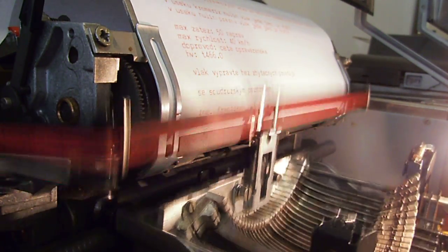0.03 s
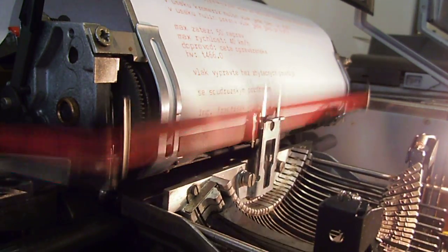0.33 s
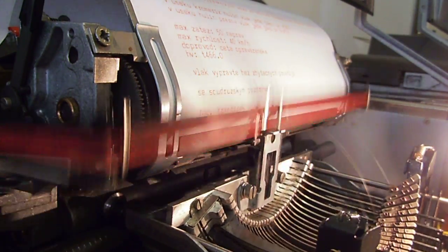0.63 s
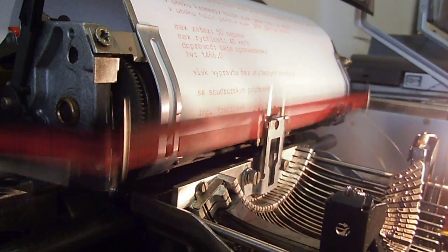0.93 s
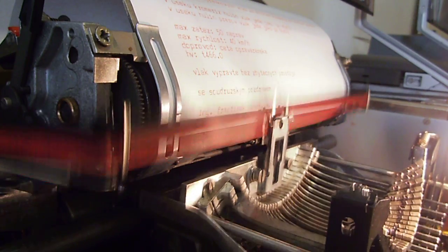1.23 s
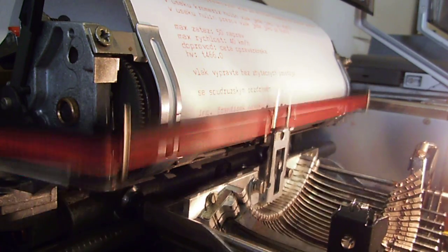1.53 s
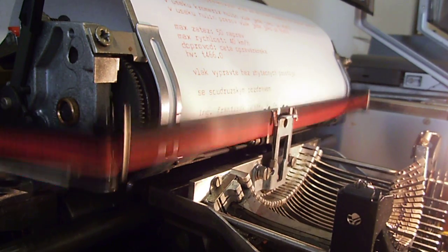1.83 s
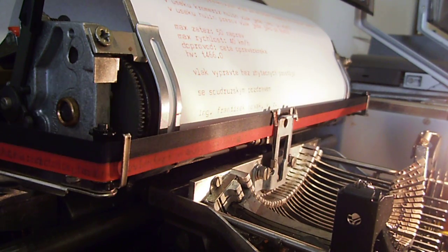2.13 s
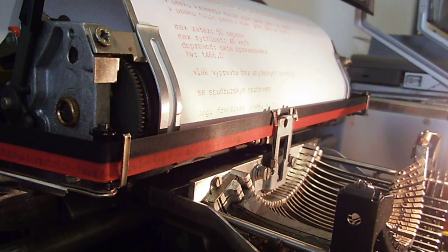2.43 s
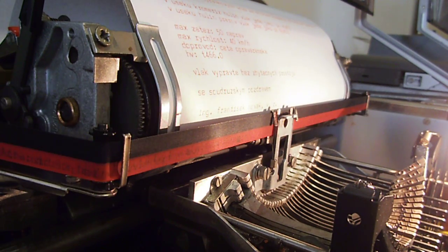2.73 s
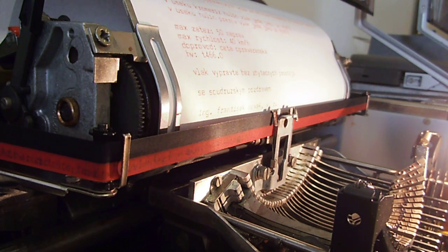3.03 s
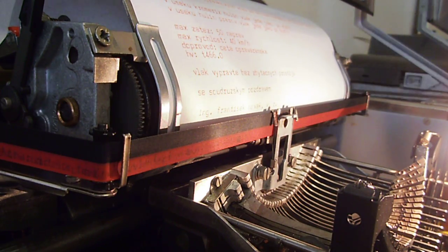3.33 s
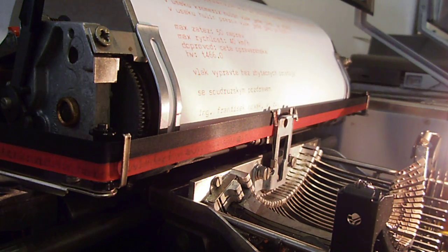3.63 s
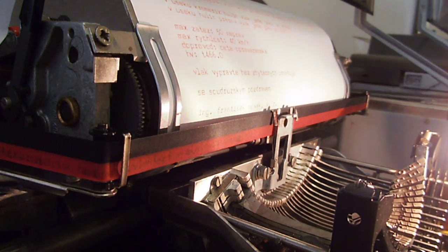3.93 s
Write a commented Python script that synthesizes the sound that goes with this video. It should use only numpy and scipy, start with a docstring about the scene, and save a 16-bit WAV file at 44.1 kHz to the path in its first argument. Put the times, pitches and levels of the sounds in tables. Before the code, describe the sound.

A teleprinter clatters in rapid strokes, then stops, leaving its motor humming.

```python
"""Teleprinter printing, then idling

Each turn of the cam shaft clacks through selector, code bars, printing bail, pawl and linkage;
on five turns a type bar hits the paper. The steel parts ring in a small room, and the loudest
clacks overload a close microphone. After two seconds the clutch lets go, leaving the hum of
motor and gears over a low, wavering drone."""
import sys
import numpy as np
from scipy import signal
from scipy.fft import rfft, irfft
from scipy.io import wavfile

SR = 44100
rng = np.random.default_rng(int(sys.argv[2]) if len(sys.argv) > 2 else 0)


def persist_wave(psi):
    """Save psi, clipped to +-1, as 16-bit WAV."""
    counts = np.round(np.clip(psi, -1, 1) * 32767).astype(np.int16)
    wavfile.write(sys.argv[1], SR, np.atleast_2d(counts).T)


N = 176400
TIME_S = np.arange(N) / SR


def amp(db):
    """Decibels to gain."""
    return 10 ** (np.asarray(db) / 20)


def unit(x):
    """Scales to rms 1."""
    return x / np.sqrt(np.mean(x ** 2) + 1e-20)


def curve_at(points, hz):
    """Reads a curve on a log-frequency axis."""
    freq_hz, value = np.transpose(points)
    return np.interp(np.log(hz + 1), np.log(freq_hz), value)


def coloured(x, tone):
    """Shapes a sound with an EQ curve, at rms 1."""
    gain = amp(curve_at(tone, np.fft.rfftfreq(len(x), 1 / SR)))
    return unit(irfft(rfft(x) * gain, len(x)))


def drift(rate_hz):
    """Random modulation, rolled off above rate_hz, at rms 1."""
    rolloff = 1 + (np.fft.rfftfreq(N, 1 / SR) / rate_hz) ** 4
    return unit(irfft(rfft(rng.standard_normal(N)) / rolloff, N))


def decay(t, t60_s):
    """An envelope that falls 60 dB in t60_s."""
    return np.exp(-np.log(1000) * t / t60_s)


def excite(force, ring):
    """Drives a ringing body with a force."""
    return signal.oaconvolve(force, ring)[:N]


def contacts(strokes, hits, chatter, jitter_s=.0004, spread_db=1.1, settle_s=.0011, size=400):
    """Force on a part: each stroke is a run of clicks, each buzzing briefly before it settles."""
    force = np.zeros(N + size)
    settling = np.exp(-np.arange(size) / SR / settle_s)
    for start_s, stroke_db in strokes:
        for delay_s, hit_db in hits:
            late, strong = rng.standard_normal(2)
            buzz = rng.standard_normal(size) * settling
            blow = chatter * buzz / np.linalg.norm(buzz)
            blow[0] += 1  # the click itself
            gain = amp(stroke_db + hit_db + spread_db * strong) / np.hypot(1, chatter)
            at = round((start_s + delay_s + jitter_s * late) * SR)
            if 0 <= at < N:
                force[at:at + size] += gain * blow
    return force[:N]


def steel(force, tone, t60_s, gain_db, size=2048, count=10):
    """Clatter: the force scatters over small steel parts, each a dense cluster of short modes."""
    part = rng.integers(0, count, N)
    envelope = decay(np.arange(size) / SR, t60_s)
    rings = [coloured(rng.standard_normal(size), tone) * envelope for _ in range(count)]
    return amp(gain_db) * sum(excite(force * (part == k), ring) for k, ring in enumerate(rings))


def modal(force, modes, gain_db):
    """A struck body with a few distinct modes, alternating in polarity."""
    t = np.arange(SR // 4) / SR
    ring = sum((-1) ** k * amp(db) * decay(t, t60_s) * np.sin(2 * np.pi * hz * t)
               for k, (hz, db, t60_s) in enumerate(modes))
    return amp(gain_db) * excite(force, ring)


# Code bar cues: start_s, level_db
CODE_BAR_STROKES = [(-0.008, 5), (0.1423, 7.5), (0.2926, -1.2), (0.4429, 1.0), (0.5932, 5), (0.7435, 0.5),
                    (0.8938, 4), (1.0441, -0.5), (1.1944, 0.2), (1.3447, 5), (1.495, 0), (1.6453, 5.5),
                    (1.8008, -1), (1.9472, 0.3)]
# Contacts within a stroke: delay_s, level_db
CODE_BAR_HITS = [(0, 2), (.003, -5.5), (.0058, -1), (.0082, 1.5), (0.01, -20.5), (.017, -5.5), (.023, -36)]
# Colour of the rattle: freq_hz, level_db
CODE_BAR_TONE = [(300, -9), (1000, -1), (2000, -9.5), (2800, -7), (3800, -14), (5400, -4.5), (6900, 4),
                 (8300, -11), (10200, -3.5), (12000, -13), (16000, -10)]

def code_bars():
    """The code bars land with a bright rattle that sets levers and frame ringing."""
    force = contacts(CODE_BAR_STROKES, CODE_BAR_HITS, chatter=2.0)
    rattle = steel(force, CODE_BAR_TONE, t60_s=.036, gain_db=-6.5)
    return rattle + levers(.8 * force) + frame(.35 * force)


# Lever modes: pitch_hz, level_db, t60_s
LEVER_MODES = [(5228, -14, .05), (5535, -10, .06), (5944, -12, .04), (6186, -11, .04), (6487, -9, .05),
               (6950, 0, .085)]

def levers(force):
    """Jolted levers add a thin, high ring."""
    return modal(force, LEVER_MODES, gain_db=-23.5)


# Frame modes: pitch_hz, level_db, t60_s
FRAME_MODES = [(288, -11, .09), (375, -12, .07), (480, -9, .07), (598, -4, .06), (655, -4, .07),
               (765, -3, .05), (852, -2.5, .08), (962, 0, .08), (1036, -3, .06), (1155, -2, .07),
               (1278, -7, .06), (1412, -7, .06), (1690, -10, .05)]

def frame(force):
    """The cast frame answers a blow with a midrange knock."""
    return modal(force, FRAME_MODES, gain_db=-11)


# Colour of the cam grind: freq_hz, level_db
CAM_TONE = [(25, -20), (110, -2), (160, -6.5), (280, -6), (400, -6.5), (620, 0.5), (850, 1), (1150, -3),
            (1500, -13), (2600, -11.5), (3800, -17), (6800, -14.5), (9000, -19), (16000, -24)]

def cams(clutch_off_s=1.972, run_down_s=.013, level_db=-19, load_boost_db=3):
    """The cam shaft grinds unevenly, harder under load, for as long as the clutch holds."""
    engaged = np.exp(-np.maximum(TIME_S - clutch_off_s, 0) / run_down_s)
    grind = unit(coloured(rng.standard_normal(N), CAM_TONE) * amp(1.13 * drift(75)))
    return amp(level_db + load_boost_db * drive_load()) * engaged * grind


# Partials of the motor hum: shaft_multiple, level_db
HUM_PARTIALS = [(2, -59), (2.5, -35.5), (5.4, -42), (6.25, -42.5), (7.5, -39), (10, -26), (11.75, -38.5),
                (12, -36.5), (16, -32), (20, -34.5), (22, -44), (23, -58), (28, -48.5), (32, -63),
                (36, -52), (50, -55), (60, -44), (120, -48), (150, -56)]
# Colour of brushes and gears: freq_hz, level_db
WHIR_TONE = [(20, -12), (45, -12), (65, -6), (140, -2.5), (180, -1.5), (270, 1), (430, -2), (600, 2.5),
             (780, 3), (900, -0.5), (1120, 5), (1400, -11.5), (1750, -9), (2100, -17.5), (2900, -11.5),
             (3700, -25), (4900, -18), (5400, -20.5), (6000, -15.5), (6600, -19.5), (7400, -13),
             (7800, -24.5), (9300, -21.5), (12500, -31.5), (13200, -28.5), (16000, -40)]

def motor(shaft_hz=49.84, wander=.0008, load_sag=.014, waver_db=1.27, gear_share=.38, whir_db=-23.5):
    """The shaft hums, sagging in pitch under load, over a whir of brushes and gears."""
    speed_hz = shaft_hz * (1 + wander * drift(4) - load_sag * drive_load())
    turns = np.cumsum(speed_hz) / SR
    hum = np.zeros(N)
    for multiple, db in HUM_PARTIALS:
        gain = np.sqrt(2) * amp(db + waver_db * (drift(4) - .64))
        hum += gain * np.sin(2 * np.pi * (multiple * turns + rng.random()))
    teeth = rng.standard_normal(round(2 * SR / shaft_hz))
    gears = teeth[(turns / 2 % 1 * len(teeth)).astype(int)]  # loops every second turn
    brushes = rng.standard_normal(N)
    rub = np.sqrt(gear_share) * gears + np.sqrt(1 - gear_share) * brushes
    flutter = amp(.62 * drift(170))
    return hum + amp(whir_db) * coloured(rub * flutter, WHIR_TONE)


# Printing bail cues: start_s, level_db
BAIL_STROKES = [(0.021, -1), (0.1713, 0.15), (0.322, -0.14), (0.4719, -0.2), (0.6225, 0.2), (0.7722, -0.33),
                (0.923, 1.6), (1.0732, 0.081), (1.2234, -0.066), (1.3735, -0.92), (1.524, -0.6),
                (1.6739, 0.32), (1.8246, -0.52)]
# Contacts within a stroke: delay_s, level_db
BAIL_HITS = [(.0005, 2), (.004, -6.5), (.0085, -3), (.012, -3)]
# Colour of the clack: freq_hz, level_db
BAIL_TONE = [(60, -24), (300, 7), (650, 11), (1300, 6), (2000, 1.5), (2800, -0.5), (3800, -5), (5000, 3.5),
             (6600, 6), (8300, -5.5), (10200, 0), (12000, -6), (16000, -14)]
# Blows to the frame within a stroke: delay_s, level_db
BAIL_THUMPS = [(.0005, -1), (.004, 3.5), (.0095, 1), (.014, 3), (.019, -8), (.027, -7)]
# Low modes of the base: pitch_hz, level_db, t60_s
BASE_MODES = [(66, -16, 0.14), (117, 3, 0.14), (194, -7, .1), (240, -10, 0.14)]

def bail():
    """The printing bail clacks, thumps the frame and rocks the base twice a stroke."""
    force = contacts(BAIL_STROKES, BAIL_HITS, chatter=1.2)
    clack = steel(force, BAIL_TONE, t60_s=.037, gain_db=-4.5)
    thumps = contacts(BAIL_STROKES, BAIL_THUMPS, chatter=.28, jitter_s=.00029, spread_db=.7)
    rocking = contacts(BAIL_STROKES, hits=[(.01218, 0), (.03755, 1)], chatter=.043, spread_db=1.3)
    return clack + frame(thumps) + modal(rocking, BASE_MODES, gain_db=-22.5)


def drive_load(half_width_s=.04):
    """Load on the drive, 0-1, swelling around each stroke of the bail."""
    return sum(np.exp(-((TIME_S - start_s) / half_width_s) ** 2) for start_s, _ in BAIL_STROKES)


# Pawl cues: start_s, level_db
PAWL_STROKES = [(0.042, -0.6), (0.1923, 0.71), (0.3426, 0.2), (0.4929, 0.1), (0.6432, -0.45),
                (0.7935, -0.37), (0.9438, 0.11), (1.0941, -0.1), (1.2444, 0.6), (1.3947, 0.22),
                (1.545, -0.0), (1.6953, -0.21)]
# Contacts within a stroke: delay_s, level_db
PAWL_HITS = [(.001, -5), (.013, -1.5), (.0155, -8)]
# Colour of the tick: freq_hz, level_db
PAWL_TONE = [(300, -24), (1000, -30), (2400, -33), (3300, -3), (4000, -1), (5000, 2), (5800, 0.5),
             (6500, -9), (7800, -8), (10000, -9), (16000, -24)]
# Modes of the ping: pitch_hz, level_db, t60_s
PAWL_MODES = [(5820, -1.5, 0.018), (6540, -2.5, .02)]

def pawl():
    """The pawl catches with a thin tick and a short ping."""
    force = contacts(PAWL_STROKES, PAWL_HITS, chatter=.99)
    return steel(force, PAWL_TONE, t60_s=.025, gain_db=-9) + modal(force, PAWL_MODES, gain_db=-7)


# Linkage cues: start_s, level_db
LINKAGE_STROKES = [(0.0625, 1.5), (0.2128, 5), (0.3631, 3), (0.5134, 3), (0.6637, 6), (0.814, -1.3),
                   (0.9643, 8.5), (1.1146, 0.4), (1.2649, 0.5), (1.4152, 5.5), (1.5655, -1), (1.7158, 6.5),
                   (1.876, 3.5)]
# Contacts within a stroke: delay_s, level_db
LINKAGE_HITS = [(0, -1), (.004, -15), (.014, -12), (.021, -7)]
# Colour of the clink: freq_hz, level_db
LINKAGE_TONE = [(60, -22), (300, 0), (1000, -7), (2000, 0), (3800, -9), (5200, -5), (6700, 12.5),
                (8300, -6), (10000, 2.5), (12000, -7), (16000, -10)]

def linkage():
    """The linkage gives a sharp clink, trailed by softer contacts."""
    force = contacts(LINKAGE_STROKES, LINKAGE_HITS, chatter=1.0)
    return steel(force, LINKAGE_TONE, t60_s=.032, gain_db=-9.5)


# Selector cues: start_s, level_db
SELECTOR_STROKES = [(0.1133, -1), (0.2636, -1.5), (0.4139, -2), (0.5642, -4.5), (0.7145, -2), (0.8648, 0.3),
                    (1.0151, -3.5), (1.1654, -2.5), (1.3157, -3), (1.466, -4.5), (1.6163, -0.5),
                    (1.7666, -1.7), (1.911, -7)]
# Contacts within a stroke: delay_s, level_db
SELECTOR_HITS = [(0, -10.5), (.0045, 4.5), (.008, 5), (.014, 6), (.0185, -38), (0.026, -9)]
# Colour of the clicks: freq_hz, level_db
SELECTOR_TONE = [(300, -5), (1000, -10.5), (2000, -20.5), (2800, -13), (3800, -19), (5500, -14),
                 (6900, 3.5), (8300, -14), (10500, -7.5), (12000, -13.5), (16000, -17)]

def selector():
    """The selector trips in a crisp run of clicks that rings the levers and taps the frame."""
    force = contacts(SELECTOR_STROKES, SELECTOR_HITS, chatter=1.2, jitter_s=.0008, spread_db=0)
    clicks = steel(force, SELECTOR_TONE, t60_s=.03, gain_db=-10)
    return clicks + levers(force) + frame(.13 * force)


# Type bar cues: start_s, level_db
TYPE_BAR_STROKES = [(.2418, 0.066), (.6925, 0.27), (.9930, -0.95), (1.4440, 1), (1.7445, -1)]
# Contacts within a stroke: delay_s, level_db
TYPE_BAR_HITS = [(0, 5), (.003, -5.5), (.0065, -25)]
# Colour of the smack: freq_hz, level_db
TYPE_BAR_TONE = [(300, -10), (1000, 7), (1800, -7.5), (2400, -5), (3200, -7), (3800, -25.5), (5300, 3),
                 (7000, 1.5), (8300, -6), (10200, -4), (12000, -14), (16000, -30)]

def type_bars():
    """A type bar hits the paper with a hard smack."""
    force = contacts(TYPE_BAR_STROKES, TYPE_BAR_HITS, chatter=1.6)
    return steel(force, TYPE_BAR_TONE, t60_s=.027, gain_db=2.5)


# Path of the drone: time_s, pitch_hz, level_db
DRONE_PATH = [(2.0, 76, -47), (2.12, 75.8, -31), (2.64, 78, -35), (2.71, 77.1, -59), (2.87, 69.8, -33),
              (3.08, 70, -64), (3.24, 69.0, -37), (3.32, 64.8, -46), (3.83, 67.0, -40), (3.94, 55.8, -37),
              (4.0, 56.1, -41)]

def drone():
    """A low tone, faint during the printing, then swelling and wavering under the hum."""
    time_s, pitch_hz, level_db = np.transpose(DRONE_PATH)
    gain = np.sqrt(2) * amp(np.interp(TIME_S, time_s, level_db) - .5 + 1.5 * drift(15))
    cycles = np.cumsum(np.interp(TIME_S, time_s, pitch_hz)) / SR
    return gain * np.sin(2 * np.pi * cycles)


# Reverb time of the room: freq_hz, t60_s
ROOM_DECAY = [(100, 0.2), (1000, 0.58), (6000, 0.28), (16000, 0.16)]

def room(x, wet_db=-12.5, build_up_s=.02):
    """A small room whose mids outlast its bass and treble."""
    hz, t, noise = signal.stft(rng.standard_normal(SR // 2), SR, nperseg=256)
    _, tail = signal.istft(noise * decay(t, curve_at(ROOM_DECAY, hz)[:, None]), SR, nperseg=256)
    tail *= np.minimum(np.arange(len(tail)) / SR / build_up_s, 1)
    return amp(wet_db) * excite(x, tail / np.linalg.norm(tail))


def scene():
    """The printing mechanism in its room, over the dry motor and drone."""
    mechanism = code_bars() + cams() + bail() + pawl() + linkage() + selector() + type_bars()
    return (mechanism + room(mechanism) + motor() + drone())[None]


def record(dry):
    """The loudest clacks overload the input; a steep low-pass trims the very top."""
    ceiling, knee, cutoff_hz = .74, 8.8, 15900
    clipped = dry / (1 + abs(dry / ceiling) ** knee) ** (1 / knee)
    lowpass = signal.firwin(511, cutoff_hz, window=("kaiser", 9), fs=SR)
    return signal.oaconvolve(clipped, lowpass[None], "same")


dry = scene()
out = record(dry)
persist_wave(out)
```